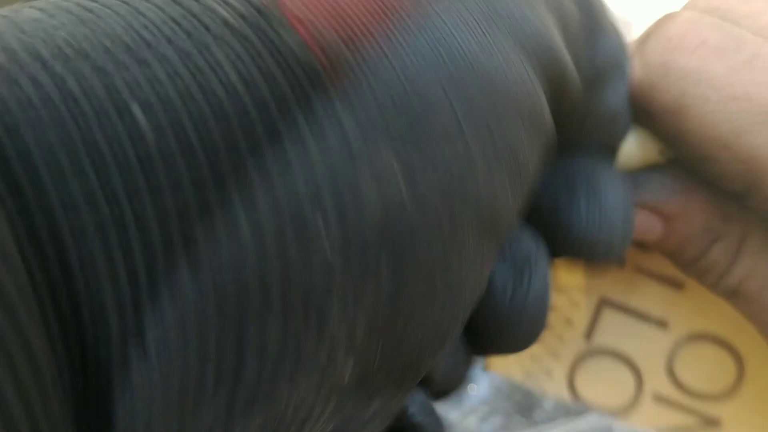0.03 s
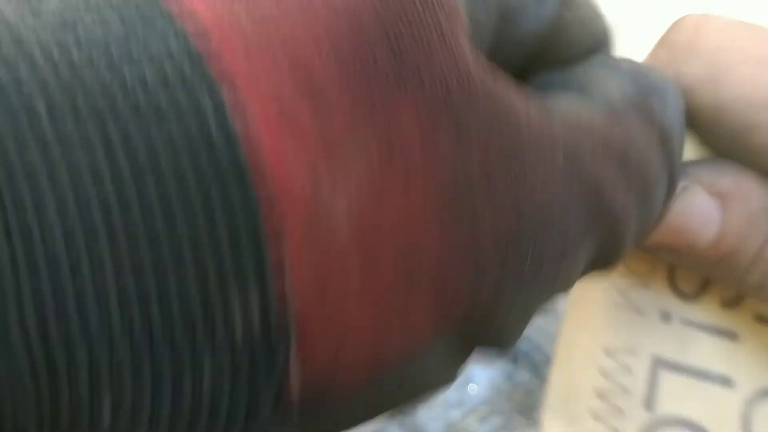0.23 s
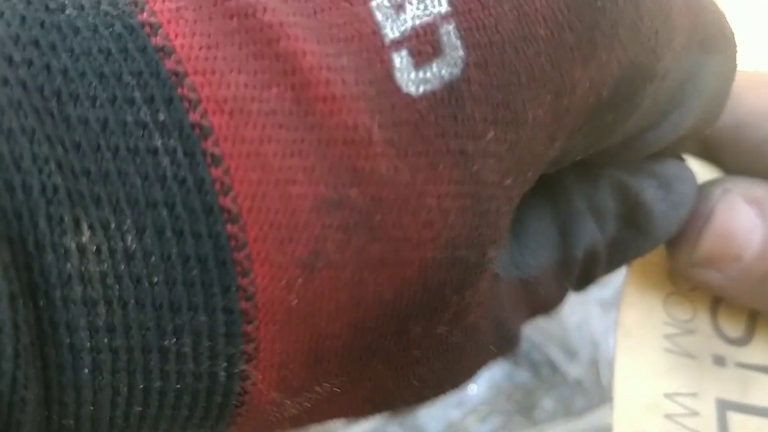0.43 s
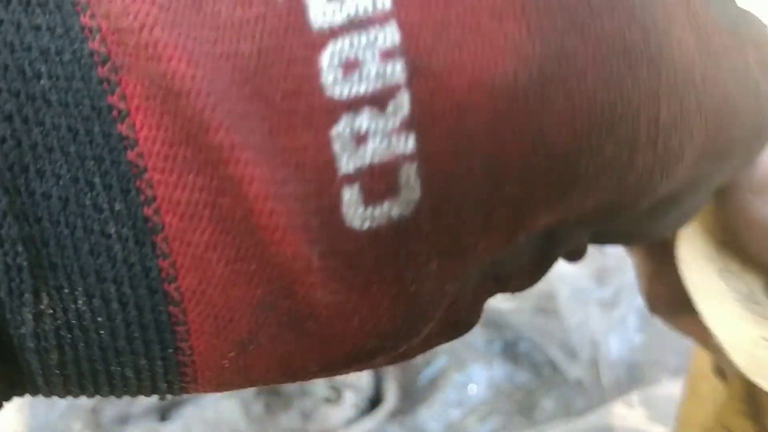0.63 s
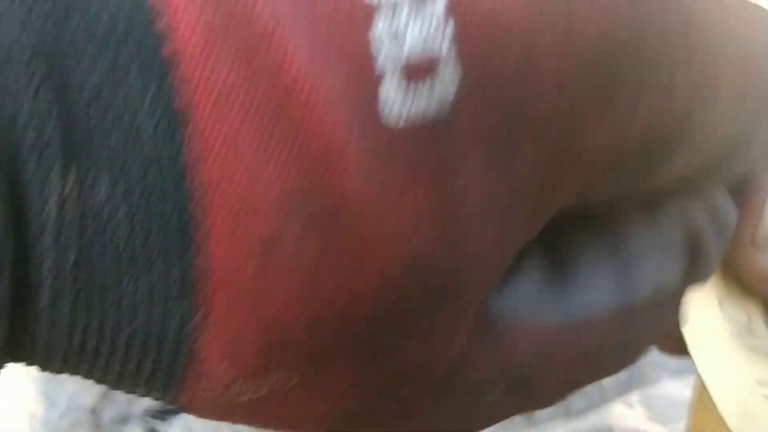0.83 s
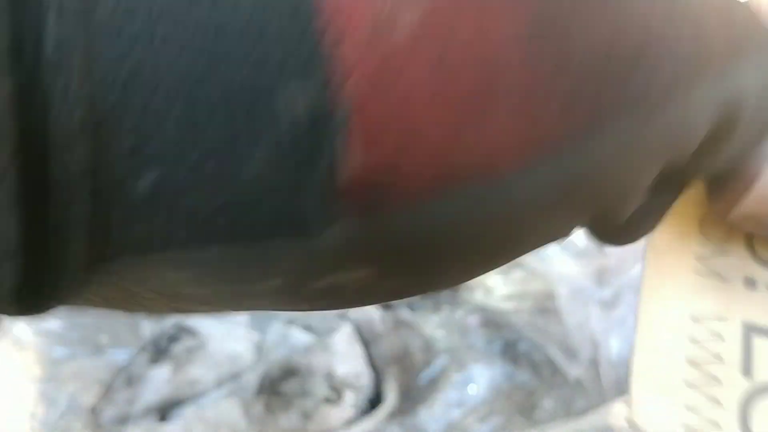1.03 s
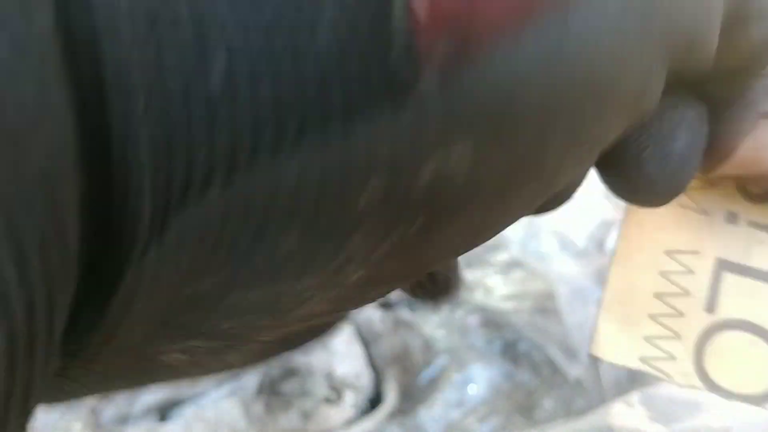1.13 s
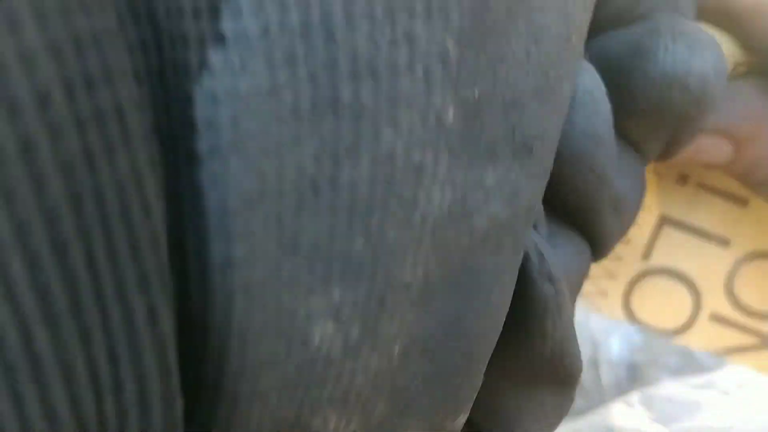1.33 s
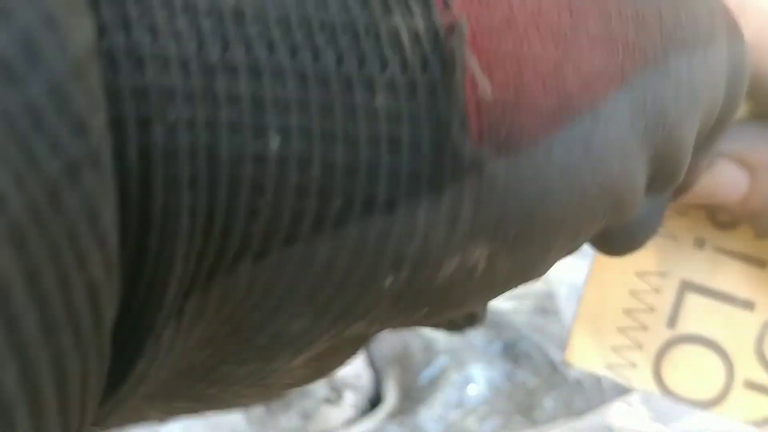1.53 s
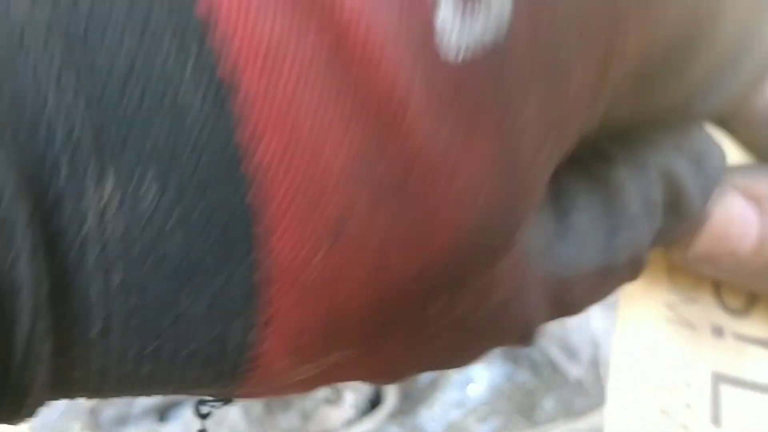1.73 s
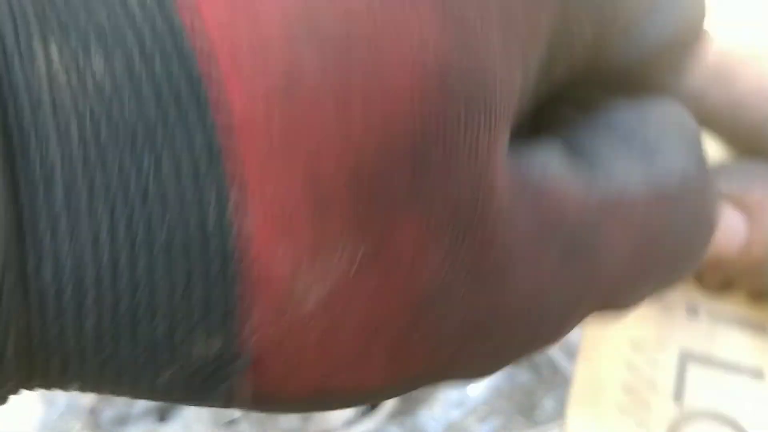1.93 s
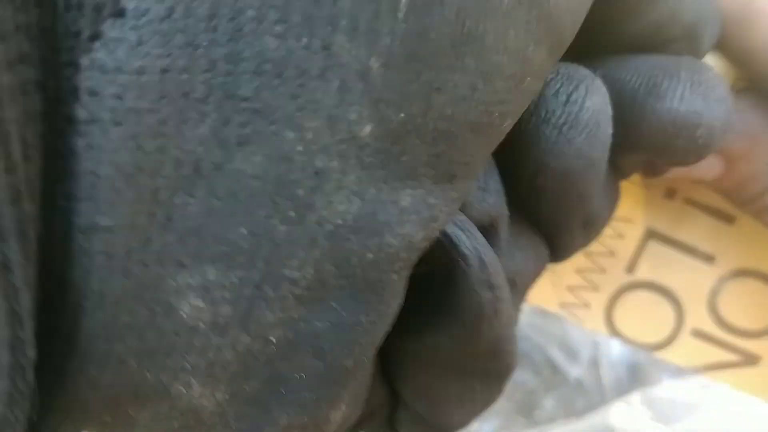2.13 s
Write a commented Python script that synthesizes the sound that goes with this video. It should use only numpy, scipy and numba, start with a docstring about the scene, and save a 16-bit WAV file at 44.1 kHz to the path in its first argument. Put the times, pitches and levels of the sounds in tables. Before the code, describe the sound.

Sandpaper rubs a hand-held steel pin, very close and dry, slightly left. The first uneven pass rasps until 0.5 s, dipping near 0.18; a shorter, softer one follows until 0.8. A longer, rougher pass runs 0.85-1.4, another 1.45-1.87 starts with clustered ticks, and the loudest ends near 2.17. Turns almost fall silent. Gritty hiss, papery midrange and a low hollow thrum move together over faint garage air.

```python
"""A gloved hand rubs fine sandpaper along a steel pin in five back-and-forth passes, close to the microphone.
Grit catches and slips on the steel: it hisses directly and rasps in the folded paper.
The same slips sound hollow in the cupped hand and make the held pin thrum.
The rubbing all but stops at each turn of the hand, and now and then the paper snags with a tick.
Behind it lies the still air of a quiet garage, made from softly coloured noise."""
import sys
import numpy as np
from scipy import signal
from scipy.fft import rfft, irfft
from scipy.io import wavfile
from scipy.ndimage import uniform_filter1d
from numba import njit

SR = 44100
rng = np.random.default_rng(int(sys.argv[2]) if len(sys.argv) > 2 else 0)


def materialize(psi):
    """Save the field psi as 16-bit PCM at rate SR to the path in sys.argv[1].

    A 1-D psi becomes a single channel; in a 2-D psi each row is a channel.
    """
    bounded = np.clip(np.atleast_2d(psi).T, -1, 1)
    quanta = np.round(bounded * 32767).astype(np.int16)
    wavfile.write(sys.argv[1], SR, quanta)


N = 96182
TIME = np.arange(N) / SR   # seconds

FULL_STROKE_DB = -31   # rasp level that counts as speed 1
# Five passes of the hand, turning near 0.52, 0.82, 1.42 and 1.88 s.
# Columns: time_s, rasp_db, hiss_db (before HISS_DB is added), hollow_db
STROKE_LEVELS = [(0.028,-62.5,-73,-59.5), (0.035,-47,-59.5,-46.5), (0.08,-44,-54.5,-40),
                 (0.105,-36.5,-50,-38), (0.151,-35,-46,-42.5), (0.172,-48,-57,-44), (0.195,-45.5,-54,-47.5),
                 (0.233,-34.5,-49,-40), (0.292,-39.5,-52,-42.5), (0.32,-31.5,-50,-41),
                 (0.361,-36.5,-51,-40.5), (0.42,-31.5,-44,-41), (0.472,-34.5,-47,-42),
                 (0.494,-63,-71,-62.5), (0.551,-56,-68,-65), (0.565,-45.5,-58.5,-50.5),
                 (0.655,-38.5,-46,-43), (0.711,-40.5,-51,-46.5), (0.729,-56,-63,-56), (0.741,-46.5,-54,-49),
                 (0.769,-47.5,-60,-49.5), (0.789,-70,-78,-73), (0.84,-65,-79,-69), (0.872,-41,-53,-48),
                 (0.939,-43.5,-52.5,-42), (0.993,-34.5,-47.5,-46), (1.096,-38,-51.5,-43),
                 (1.112,-29.5,-41.5,-42), (1.125,-37,-46,-42), (1.18,-41,-53.5,-40.5),
                 (1.207,-33,-46,-35.5), (1.244,-41,-58.5,-45.5), (1.289,-30,-46,-35), (1.352,-29,-40.5,-36),
                 (1.385,-38.5,-59,-44), (1.406,-68,-71,-66), (1.436,-68.5,-72,-63), (1.446,-50.5,-64,-50.5),
                 (1.497,-51,-69,-49.5), (1.499,-38.5,-53.5,-43.5), (1.564,-35.5,-49,-38),
                 (1.631,-37,-53.5,-46), (1.739,-33.5,-44.5,-38.5), (1.796,-34.5,-46.5,-44),
                 (1.813,-53,-69,-59.5), (1.821,-55,-61,-39), (1.825,-33.5,-46,-45), (1.862,-44.5,-59,-47.5),
                 (1.878,-59.5,-68,-64), (1.89,-61,-64,-57), (1.902,-36,-49,-42.5), (1.975,-30.5,-41.5,-40),
                 (2.018,-34.5,-46.5,-38.5), (2.079,-27.5,-43,-40.5), (2.139,-29,-44,-41.5),
                 (2.167,-49,-62,-54)]


def sanding():
    """The same catching and slipping drives the paper, the hiss, the hand and the pin."""
    times, *columns = np.transpose(STROKE_LEVELS)
    rasp, bright, hollow = [from_db(np.interp(TIME, times, levels)) for levels in columns]
    # speed goes as the square root of the rasp's amplitude
    speed = np.sqrt(rasp / from_db(FULL_STROKE_DB))
    slip = snags(catches(speed))
    rubbing = paper_rasp(slip, rasp) + grit_hiss(slip, bright)
    return steel_ring(rubbing) + hand_hollow(slip, hollow) + pin_thrum(slip, hollow)


CATCHES_PER_S = 300   # typical rate at speed 1
CATCH_DECAY_S, CATCH_SIZE = 0.0022, 0.79   # grit bites at once, then lets go
GRIP_HZ, GRIP_DB = 99, 1.0   # fastest rate and spread of the unsteady finger pressure


def catches(speed):
    """Friction jumps when grit bites: separate scratches in a slow hand, a dense rasp in a fast one."""
    rate = CATCHES_PER_S * speed * from_db(4 * wobble(300))
    count = np.cumsum(rate / SR)
    # a bite falls wherever the running count passes a whole number
    is_bite = np.diff(np.floor(count), prepend=0) > 0
    bites = is_bite * rng.uniform(0.17, 1.32, N)
    decay = np.exp(-1 / (CATCH_DECAY_S * SR))
    surge = signal.lfilter([1], [1, -decay], bites + 1e-18)
    friction = 0.16 + 0.5 * speed ** 2 + CATCH_SIZE * surge
    # even out the slow level to about rms 1, before the grip's wobble
    running_rms = np.sqrt(uniform_filter1d(friction ** 2, size=1100))
    return friction / running_rms * from_db(GRIP_DB * wobble(GRIP_HZ))


SNAG_HOLD_S, SNAG_DECAY_S = 0.0017, 0.0037
STICK_S, STICK_DB = 0.0037, -5.5   # the lull before each snag
# Moments when the stuck paper snags free with a tick.
# Columns: start_s, level_db (against the average friction of the stroke)
SNAG_TIMES = [(0.046, 0.5), (0.059, 5), (0.211, 5), (0.225, 4.5), (0.274, 4), (0.362, -0.5), (0.583, 5.5),
              (1.106, 8), (1.202, 5.5), (1.462, 4.5), (1.476, 10), (1.485, 5), (1.498, 6), (1.511, 4),
              (1.825, 5), (1.9, 4.5), (1.908, -0.5)]


def snags(friction):
    """At each snag the rubbing lulls, then friction leaps, holds briefly and dies in a few milliseconds."""
    stuck = np.zeros(N, dtype=bool)
    leap = np.zeros(N)
    for start, db in SNAG_TIMES:
        stuck |= (TIME > start - STICK_S) & (TIME < start + SNAG_HOLD_S)
        fade = np.exp(-np.maximum(TIME - start - SNAG_HOLD_S, 0) / SNAG_DECAY_S)
        leap = np.maximum(leap, from_db(db) * (TIME >= start) * fade)
    return np.maximum(friction * from_db(STICK_DB * stuck), leap)


PAPER_PAN_DB, PAPER_LIKENESS = 6, 0.46   # left over right; share common to both sides
PAPER_LOW_HZ, PAPER_TOP_HZ = 980, 5530
# Resonances of the folded paper on the pin.
# Columns: pitch_hz, width_hz, level_db (against each other, before the tilt)
PAPER_RESONANCES = [(1440, 137, -3.5), (1640, 80, -3), (1885, 290, -2.5), (2385, 190, -2), (2624, 236, 1.5),
                    (3030, 510, 1), (4197, 750, -7)]
# Brightness of the paper as the fold shifts in the grip.
# Columns: time_s, tilt_db_per_octave
PAPER_BRIGHTNESS = [(0.2, 3.5), (0.45, -1), (0.65, -2.5), (1.15, -4), (1.55, 2.5), (1.8, 1), (1.95, 1.5),
                    (2.1, 0)]


def paper_rasp(slip, level):
    """Grit shakes the folded paper, whose resonances turn the slips into a rasp."""
    tilt = np.interp(TIME, *np.transpose(PAPER_BRIGHTNESS))
    return body(PAPER_RESONANCES, slip, level, PAPER_PAN_DB, PAPER_LIKENESS,
                PAPER_LOW_HZ, PAPER_TOP_HZ, tilt)


HISS_DB, HISS_PAN_DB, HISS_LIKENESS = 3.5, 5, 0.13   # gain; left over right; share common to both sides
HISS_TILT_HZ, HISS_SHADOW = 8640, 0.97   # the hand shades the right side from the highest hiss
# Colour of the direct hiss of the grit.
# Columns: pitch_hz, level_db (per Hz, against each other)
HISS_COLOUR = [(100, -58), (1000, 0.5), (3000, 3.5), (6000, 1.5), (8500, -2.5), (15500, -9.5)]


def grit_hiss(slip, level):
    """Tiny impacts reach the air straight from the grit, duller on the shaded right side."""
    smooth_slip = uniform_filter1d(slip, size=110)
    impacts = place(grit(smooth_slip), HISS_PAN_DB, HISS_LIKENESS)
    left, right = colour(impacts, HISS_COLOUR)
    dull = cut(right, HISS_TILT_HZ, "low", order=1)
    right = (1 - HISS_SHADOW) * right + HISS_SHADOW * dull
    return from_db(HISS_DB) * level * unit(np.array([left, right]))


RING_DB, RING_T60_S = -8.5, 0.035   # level against the direct sound; time to fall 60 dB


def steel_ring(direct):
    """The pin adds a brief, dense ring of many weak modes, quickly damped by the fingers."""
    t = TIME[:SR // 10]
    ring = rng.standard_normal((2, len(t))) * from_db(-60 * t / RING_T60_S)
    ring *= from_db(RING_DB) / np.sqrt(np.sum(ring ** 2, axis=1, keepdims=True))
    ringing = signal.fftconvolve(direct, ring, axes=1)[:, :N]
    # scale the sum to make up for the added energy
    return (direct + ringing) / np.hypot(1, from_db(RING_DB))


HAND_PAN_DB, HAND_LIKENESS = -1, 0.87   # left over right; share common to both sides
HAND_LOW_HZ, HAND_TOP_HZ = 188, 1490
# Resonances of the hollow in the cupped hand.
# Columns: pitch_hz, width_hz, level_db (against each other)
HAND_RESONANCES = [(379, 165, -7.5), (551, 95, -4), (696, 137, -0.5), (875, 101, 2), (1120, 530, -0.5)]


def hand_hollow(slip, level):
    """The air in the cupped hand resonates low and hollow with the slips."""
    return body(HAND_RESONANCES, slip, level, HAND_PAN_DB, HAND_LIKENESS, HAND_LOW_HZ, HAND_TOP_HZ)


THRUM_PAN_DB, THRUM_LOW_HZ, THRUM_TOP_HZ = -2, 68.5, 500
# Low resonances of the held pin.
# Columns: pitch_hz, width_hz, level_db (against each other)
THRUM_RESONANCES = [(246.5, 99, -1.6), (299.6, 78, -0.4)]
# Rise and fall of the thrum.
# Columns: time_s, level_db (against the hollow)
THRUM_LEVELS = [(0.15,-8.5), (0.5,-6.5), (0.69,-2), (0.9,-9), (1.3,-13), (1.48,-17), (1.57,-6), (1.7,-8.5),
                (1.97,-30), (2.04,-4.5), (2.18,-12)]


def pin_thrum(slip, hollow):
    """The held pin resonates lowest of all, driven by the same slips."""
    level = hollow * from_db(np.interp(TIME, *np.transpose(THRUM_LEVELS)))
    return body(THRUM_RESONANCES, slip, level, THRUM_PAN_DB, HAND_LIKENESS, THRUM_LOW_HZ, THRUM_TOP_HZ)


FLEX_HZ = 14.5   # fastest rate at which each resonance wanders as the grip flexes
FLEX_SHARE, FLEX_DB = 0.015, 1.5   # spread in pitch (share of the pitch) and in strength


def body(resonances, slip, level, pan_db, likeness, low_hz, top_hz, tilt=0):
    """The same grit rings all the wandering resonances; level sets how hard, tilt how bright."""
    impacts = place(grit(slip), pan_db, likeness)
    driven = np.zeros((2, N))
    middle_hz = np.sqrt(low_hz * top_hz)
    for k, (hz, width, db) in enumerate(resonances):
        octaves = np.log2(hz / middle_hz)
        gain = from_db(db + FLEX_DB * wobble(FLEX_HZ) + tilt * octaves)
        angle = 2 * np.pi * hz / SR * (1 + FLEX_SHARE * wobble(FLEX_HZ))
        sign = (-1) ** k   # neighbours ring in opposite directions
        drive = impacts * (level * gain * np.sqrt(width) * sign)
        driven += resonate(drive, angle, np.exp(-np.pi * width / SR))
    trimmed = cut(cut(driven, low_hz, "high", order=3), top_hz, "low")
    return unit(trimmed) * np.sqrt(np.mean(level ** 2))


@njit
def resonate(x, angle, r):
    """A two-pole resonance with a moving pitch; r sets how slowly it dies."""
    y = np.zeros_like(x)
    for i in range(2, x.shape[1]):
        pull = 2 * r * np.cos(angle[i])
        for c in range(x.shape[0]):
            y[c, i] = x[c, i] - x[c, i - 2] + pull * y[c, i - 1] - r * r * y[c, i - 2]
    return y


GRAINS_PER_S, GRAIN_SPREAD_DB = 18000, 2.5


def grit(slip):
    """Three unrelated streams of tiny impacts of uneven size, all following the same slips."""
    sizes = from_db(GRAIN_SPREAD_DB * np.minimum(rng.exponential(1, (3, N)), 5))
    signs = rng.choice([-1, 1], (3, N))
    hits = rng.random((3, N)) < GRAINS_PER_S / SR
    return slip * sizes * signs * hits


def place(streams, pan_db, likeness):
    """One stream reaches both sides, the others one side each; pan is left over right."""
    both = np.sqrt(likeness) * streams[0]
    single = np.sqrt(1 - likeness) * streams[1:]
    return (both + single) * from_db([[pan_db / 2], [-pan_db / 2]])


def wobble(hz):
    """Random motion up to a given rate, with a spread of 1."""
    # the first second is dropped so that the filter has settled
    return unit(cut(rng.standard_normal(N + SR), hz, "low")[SR:])


def colour(x, points):
    """Give a signal a smooth spectrum, drawn through points of pitch and level."""
    hz, db = np.transpose(points)
    bins = np.maximum(np.arange(N // 2 + 1) * SR / N, 1)
    gain = from_db(np.interp(np.log(bins), np.log(hz), db))
    return irfft(rfft(x) * gain, N)


def cut(x, hz, kind, order=2):
    """Remove what lies above ("low") or below ("high") a pitch."""
    sos = signal.butter(order, min(hz, 0.45 * SR), kind, fs=SR, output="sos")
    return signal.sosfilt(sos, x)


def unit(x):
    """Scale so that the average of the channels has rms 1."""
    return x / np.sqrt(np.mean(np.atleast_2d(x).mean(0) ** 2) + 1e-20)


def from_db(db):
    """Turn decibels into gain."""
    return 10 ** (np.asarray(db) / 20)


AIR_DB = -68
# Colour of the still air of the garage.
# Columns: pitch_hz, level_db (per Hz, against each other)
AIR_COLOUR = [(60, 2.5), (300, 8.5), (800, 1), (2800, -1), (15000, -19)]


def still_air():
    """Steady, softly coloured noise, partly shared by the two sides."""
    noise = place(rng.standard_normal((3, N)), pan_db=0.5, likeness=0.38)
    return from_db(AIR_DB) * unit(colour(noise, AIR_COLOUR))


def scene():
    """Sanding over the still air."""
    return sanding() + still_air()


CUTOFF_HZ = 15850


def record(dry):
    """Cut the highest treble steeply."""
    sos = signal.ellip(12, 0.1, 80, CUTOFF_HZ, fs=SR, output="sos")
    return signal.sosfilt(sos, dry)


dry = scene()
out = record(dry)
materialize(out)
```